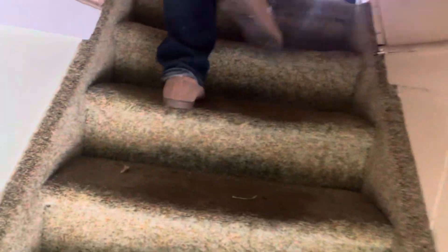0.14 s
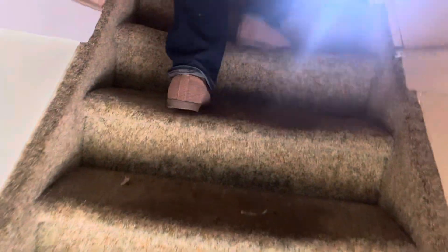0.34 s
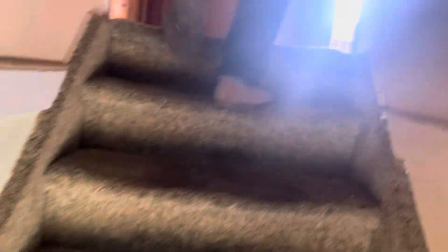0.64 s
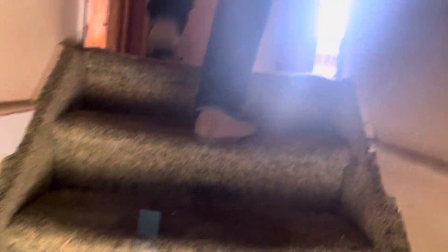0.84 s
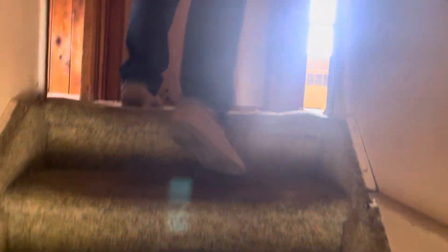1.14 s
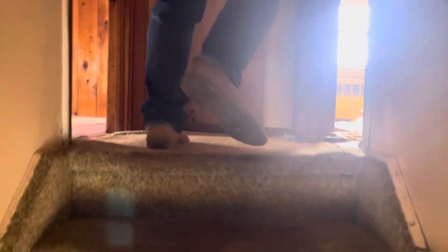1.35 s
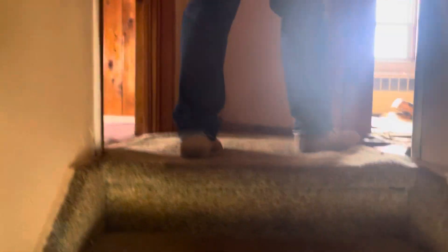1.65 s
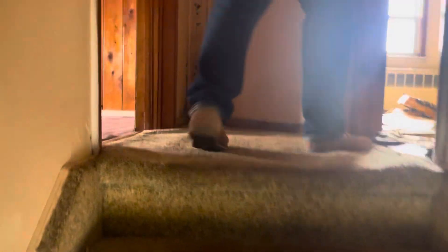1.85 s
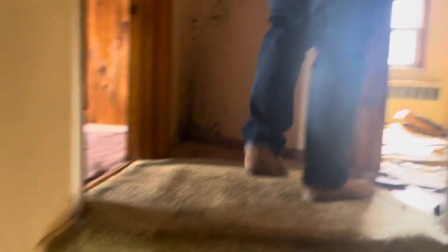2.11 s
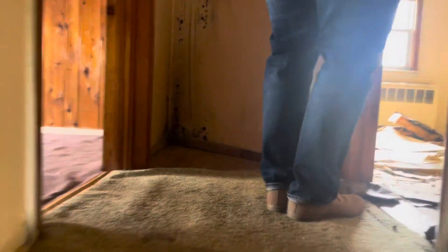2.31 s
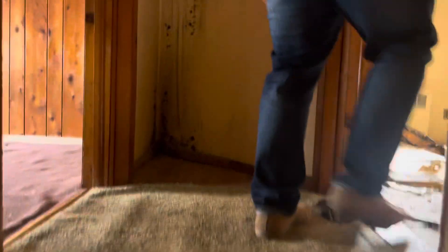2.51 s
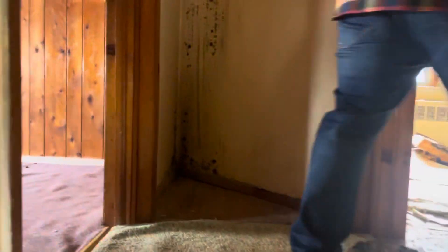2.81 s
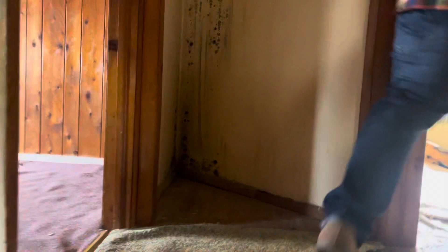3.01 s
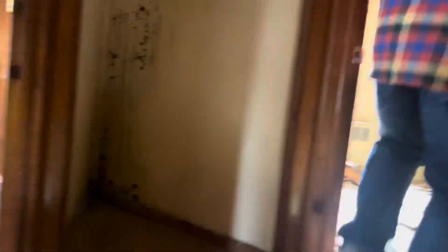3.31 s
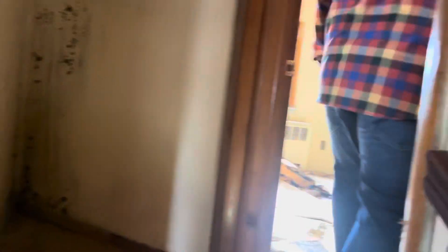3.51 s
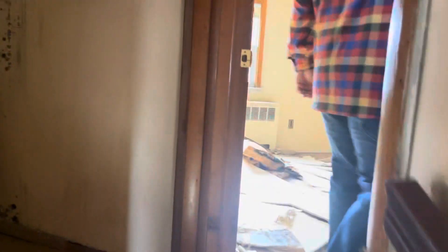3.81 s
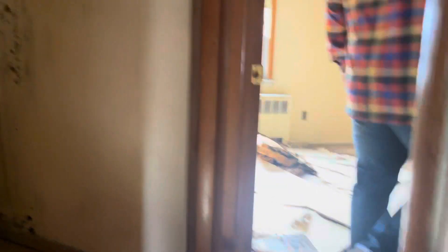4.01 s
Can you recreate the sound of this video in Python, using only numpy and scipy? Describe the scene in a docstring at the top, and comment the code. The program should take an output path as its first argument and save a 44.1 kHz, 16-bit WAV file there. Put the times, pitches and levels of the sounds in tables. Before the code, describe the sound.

Close stereo pickup in a small stairwell: dull, bass-heavy footfalls on carpet over hollow wood, each sagging downward in pitch and leaving a brief murmur in the floor. Quiet steps of a second climber fill the gaps. Soft scuffs grow more frequent on the landing, clothing hisses lightly, and something small knocks and clicks beside the microphone midway, then clicks again late. Little else breaks the quiet.

```python
"""A carpeted wooden staircase and landing: two people climb, heavy steps thudding among lighter ones.
Each foot rings damped stair modes and a noise-tail echo; the floor's hum and the drag swell after it.
Soles scuff the pile and clothes rustle as shaped noise; small things knock (two damped sines) and
click (bursts through resonances) near the microphones. Bass arrives late, so each thud sweeps downward."""
import sys
import numpy as np
from scipy import signal
from scipy.fft import rfft, irfft, next_fast_len
from scipy.io import wavfile
from scipy.ndimage import map_coordinates

SR = 44100
rng = np.random.default_rng(int(sys.argv[2]) if len(sys.argv) > 2 else 0)


def volts_from_db(level):
    """Convert decibel levels to linear amplitude ratios."""
    exponent = np.asarray(level, float) / 20
    return 10 ** exponent


def wrap_up_sound(samples):
    """Save the sound to the file named by the first command line argument, as 16-bit audio."""
    columns = np.atleast_2d(samples).T
    # keep every value between -1 and 1, then stretch to whole-number steps
    tamed = np.clip(columns, -1, 1)
    steps = np.round(tamed * 32767).astype(np.int16)
    wavfile.write(sys.argv[1], SR, steps)


N = 183191  # length in samples

# footfalls: t/s, blow on the tread/dB, settling weight/dB, softness (joist over tread)/dB, distance/m
FOOTFALLS = [(0.034, -41.5, -50.5, -4, 0.78), (0.219, -40.5, -24.5, 19, 1.9),
             (0.356, -31.5, -52, -32.5, 3.9), (0.418, -35, -70, -3, 3.9), (0.456, -39.5, -42.5, 10.5, .6),
             (0.55, -48, -44.5, 5, 1), (0.875, -51.5, -44, 6, 0.96), (0.926, -39, -33, 4, 3.6),
             (0.949, -37, -40, 7, 1.3), (1.006, -15, -22, -8, 1.12), (1.125, -46, -49, -1, 2.1),
             (1.18, -41.5, -68, -11, 2.3), (1.367, -46.5, -40.5, 2, .4), (1.705, -17, -19.5, -6, 1.38),
             (2.203, -47.5, -42.5, -2, 1.3), (2.378, -9, -13.5, -19.5, 1.43),
             (2.618, -29.5, -74, -6.5, 2.4), (2.656, -42, -54, -5, 1.2), (2.7, -36.5, -53, -16, 3.6),
             (2.89, -43.5, -47, -15, 2.6), (2.96, -18, -20, 0, 1.94), (3.092, -44, -42, 9, 0.46),
             (3.231, -49.5, -56, 8, 1.9), (3.329, -43.5, -62, 5, 0.3), (3.587, -40, -69, 2.5, 3.2),
             (3.646, -18.5, -22, 4, 1.17), (3.97, -58.5, -57, -3, 4.8)]
# width of the low sounds: f/Hz, side over mid/dB
LOW_WIDTH = [(60, -14.5), (150, -11), (350, -11), (700, -2.5), (1500, -4)]
SWEEP_CYCLES = 1.3  # bass delay, in periods of (pitch + 15 Hz)
STILL_DB = -47.5  # level of the still floor


def along(points, hz):
    """Reads a (f/Hz, value) curve on a log frequency axis."""
    f, v = np.transpose(points)
    return np.interp(np.log(hz + 1), np.log(f + 1), v)


def curves(rows):
    """One value per sample for each column after the time."""
    s, *cols = np.transpose(rows)
    return [np.interp(np.arange(N) / SR, s, c) for c in cols]


def wobble(rate):
    """A smooth random curve with rate knots a second."""
    knots = rng.standard_normal(int(N * rate / SR) + 4)
    return map_coordinates(knots, [np.arange(N) * rate / SR])


def filtered(x, response):
    """Shapes x by a complex response of frequency."""
    m = next_fast_len(N + SR // 2)
    return irfft(rfft(x, m) * response(np.fft.rfftfreq(m, 1 / SR)), m)[..., :N]


def muffled(x, top_hz):
    """A steep causal low-pass: padding swallows the edge of a blow."""
    return signal.sosfilt(signal.butter(10, top_hz, fs=SR, output="sos"), x)


def add(track, s, sound):
    """Mixes a sound in at s seconds."""
    part = track[..., max(round(s * SR), 0):][..., :sound.shape[-1]]
    part += sound[..., :part.shape[-1]]


def pair(mid, side):
    """Left and right from mid and side."""
    return np.array([mid + side, mid - side])


def wide_noise(spectrum):
    """Stereo noise, mid rms 1, narrow in the bass and wider above."""
    a, b = rng.standard_normal((2, N))
    mid = filtered(a, lambda hz: volts_from_db(along(spectrum, hz)))
    side = filtered(b, lambda hz: volts_from_db(along(spectrum, hz) + along(LOW_WIDTH, hz)))
    return pair(mid, side) / np.std(mid)


def ports(spectrum):
    """Stereo noise, mid rms 1, as two close ports hear it: out of step at the top."""
    # sum of the ports: f/Hz, level/dB
    sum_db = [(9000, 1.5), (9700, 0), (10200, -35.5), (10600, -2), (11200, -0.5)]
    # difference of the ports: f/Hz, level/dB
    difference_db = [(400, -7.5), (1000, 0.5), (4000, -3.5), (6300, -4), (7500, -3.5), (8700, -13),
                     (9500, 4.5), (10500, 7.5), (11500, -3), (12500, -8)]
    # share of the difference that follows the sum: f/Hz, share/0-1
    tied_share = [(2000, 0), (5000, 0.6), (9000, 0.9)]
    a, b = rng.standard_normal((2, N))
    tied = lambda hz: np.clip(along(tied_share, hz), 0, .99)
    wide = lambda hz: volts_from_db(along(spectrum, hz) + along(difference_db, hz))
    mid = filtered(a, lambda hz: volts_from_db(along(spectrum, hz) + along(sum_db, hz)))
    following = filtered(a, lambda hz: 1j * tied(hz) * wide(hz))  # a quarter cycle from the sum
    free = filtered(b, lambda hz: np.sqrt(1 - tied(hz) ** 2) * wide(hz))
    return pair(mid, following + free) / np.std(mid)


def stirring():
    """Weight shifts after every footfall: a swell that dies away, in dB over the still floor."""
    peak_s, under_foot_db = 0.099, -25  # swell's peak: time after landing, level against the foot
    power, u = np.ones(N), np.arange(SR) / SR / peak_s
    for s, blow_db, weight_db, *_ in FOOTFALLS:
        peak = volts_from_db(max(blow_db, weight_db) + under_foot_db - STILL_DB)
        add(power, s, (peak * u * np.exp(1 - u)) ** 2)
    return 10 * np.log10(power)


def house():
    """The floor keeps stirring under shifting weight: a low noise hum that swells after each step."""
    # colour of the hum: f/Hz, relative density/dB per Hz
    hum = [(15, -60), (25, 11), (59, 14.5), (135, 0), (257, -5), (358, -12.5), (395, -4), (480, -9.5),
           (700, -23), (910, -67), (1540, -120)]
    return volts_from_db(STILL_DB + stirring() + 1.9 * wobble(7.75)) * wide_noise(hum)


def movement():
    """Soles drag softly over the pile, more after a step; cloth hisses with a flickering level."""
    # rustle of clothes: t/s, level/dB
    rustling = [(0.0, -60), (0.66, -63), (1.0, -62.5), (1.36, -65.5), (1.58, -65), (1.81, -63),
                (2.03, -72.5), (2.24, -60), (2.35, -58.5), (2.51, -66.5), (2.95, -63.5), (3.19, -67),
                (3.43, -64.5), (3.61, -61), (3.84, -66), (4.15, -62)]
    # colour of the drag: f/Hz, relative density/dB per Hz
    drag_colour = [(150, -4), (350, -4), (600, -3.5), (1000, -6.5), (2000, -12), (3500, -16), (7000, -34)]
    # colour of the rustle: f/Hz, relative density/dB per Hz
    cloth_colour = [(800, 2), (2000, -3), (4000, -1), (6000, -0.5), (8500, 4.5), (11000, 3), (12000, -12),
                    (13000, -81)]
    drag_db = -60 + 0.22 * stirring() + 1.6 * wobble(30)  # 0.22 dB gained per dB of stirring
    drag = volts_from_db(drag_db) * wide_noise(drag_colour)
    cloth_db = curves(rustling)[0] + 0.79 * wobble(16) + 0.24 * wobble(100)
    return drag + volts_from_db(cloth_db) * ports(cloth_colour)


def echo(sound):
    """The stairwell's answer, new for each step: a noise tail in which each frequency dies at its own speed."""
    # decay of the stairwell: f/Hz, t60/s
    decay = [(60, 0.9), (150, 0.34), (400, 0.51), (1500, 0.73)]
    hz, t, z = signal.stft(rng.standard_normal((2, SR // 2)), SR, nperseg=1024)
    fading = z * volts_from_db(-60 * t / along(decay, hz)[:, None])
    tail = signal.istft(fading, SR, nperseg=1024)[1]
    onset = np.clip(np.arange(tail.shape[1]) / (0.0086 * SR), 0, 1)  # 8.6 ms fade-in
    tail = tail * onset / np.linalg.norm(tail[0])
    return signal.fftconvolve(sound[None], tail, axes=1)


def steps():
    """Each foot rings the same stair modes with its own weight; the boom starts late, as the weight settles."""
    # pitches where tread, boom, joist and riser are weighted: f/Hz
    part_hz = [200, 60, 120, 350]
    # what the stair rings with: f/Hz, level/dB, t60/s
    stair = [(37.1, 1, 0.5), (58.5, 1, 0.16), (63.2, 8, 0.35), (79.45, -11, 0.56), (108.5, 2.5, 0.15),
             (134, -7, 0.22), (147.9, -1.5, 0.25), (190.8, 1.5, 0.17), (215.3, -7, 0.265), (280, 0, 0.17),
             (339.6, 3, 0.19), (390.4, -3.5, 0.24), (460, -22, 0.58), (487, -17, 0.064), (132.5, 3, 0.046),
             (186.6, -2.5, 0.037), (314, 6.5, 0.028)]
    # phase of the thuds' side part: f/Hz, phase/radians
    side_phase = [(60, 2.1), (150, 0.98), (400, 2.1)]
    riser_db, riser_loss, riser_gain = -20.5, 1.2, 0.23  # under the tread; dB per dB of softness, of hardness
    even_m = 2.01  # distance at which the echo enters at unit gain
    direct, answer, t = np.zeros(N), np.zeros((2, N)), np.arange(SR // 2) / SR
    hz, mode_db, t60 = np.transpose(stair)[:, :, None]
    order = np.argsort(part_hz)
    age = np.clip(t - 0.01446 * (hz < 95), 0, None)  # boom modes start 14.46 ms late
    build_up = 1 - np.exp(-age * hz / 0.27)
    shape = build_up * np.sin(2 * np.pi * hz * age) * volts_from_db(-60 * age / t60)
    for s, blow_db, boom_db, soft_db, far_m in FOOTFALLS:
        joist_db = blow_db + soft_db
        ringing_db = blow_db + riser_db - max(riser_loss * soft_db, riser_gain * soft_db)
        weight_db = [blow_db, boom_db, joist_db, ringing_db]
        colour_db = along(np.transpose([part_hz, weight_db])[order], hz)
        spread_db = 1.5 * rng.standard_normal(hz.shape)  # every foot excites the modes a little differently
        # a soft landing has a duller edge
        top_hz = np.clip(500 * volts_from_db(0.14 * (ringing_db - max(weight_db) + 13.0)), 250, 700)
        ring = muffled(np.sum(volts_from_db(mode_db + colour_db + spread_db) * shape, 0), top_hz)
        start = s - SWEEP_CYCLES / 260  # early, to make up for the later bass delay
        add(direct, start, ring)
        early = ring[:SR // 16] * np.hanning(SR // 8)[SR // 16:]
        add(answer, start, far_m / even_m * echo(early))
    side = filtered(answer[1], lambda f: volts_from_db(along(LOW_WIDTH, f) - 1.5))
    tilt = filtered(direct, lambda f: volts_from_db(along(LOW_WIDTH, f) - 2.5) * np.exp(1j * along(side_phase, f)))
    return pair(direct + answer[0], side + tilt)


def scuffs():
    """A sole catches the pile: grainy noise that bites at the start and then fades, with its own colour."""
    # scuffs: t/s, rub of the sole/dB, hiss of the fibres/dB, t60/s, fineness of the hiss/dB per octave
    catches = [(0.043, -56.5, -69, 0.23, 3), (0.353, -62, -60, 0.21, -11.5), (0.406, -51, -63, 0.34, -11.5),
               (0.71, -48, -81, 0.18, 3), (0.797, -74, -60, 0.55, 5), (0.939, -50.5, -81, 0.14, 4),
               (1.02, -45, -75, 0.18, -11), (1.187, -65, -66, 0.17, -5), (1.334, -52.5, -70, 0.89, 0),
               (1.556, -55.5, -69.5, 0.5, 10), (1.702, -50.5, -84, 0.2, -11), (1.901, -44.5, -75, 0.39, -6),
               (1.974, -46, -69.5, 0.43, -14), (2.191, -44.5, -76, 0.26, -6), (2.385, -42, -75, 0.32, -10),
               (2.615, -44, -53, 0.36, 5), (2.684, -40.5, -63.5, 0.31, 8), (2.759, -66, -64, 0.96, 5),
               (2.958, -53.5, -74, 0.22, -13.5), (3.04, -68, -52.5, 0.49, -2.5),
               (3.428, -77, -66, 0.65, 9.5), (3.646, -46.5, -67, 0.25, -2), (3.67, -47, -78, 0.23, -6),
               (3.75, -75, -51, 0.4, 4), (3.828, -71, -58, 0.29, 2.5), (3.923, -69, -53, 0.31, 1)]
    # centres of the noise bands: f/Hz
    band_hz = [560, 1500, 3500, 8500]
    # colour of the rub in those bands: level/dB
    rub_colour = [0, -10, -37, -45]
    # colour of the hiss in those bands: level/dB
    hiss_colour = [-12, -3.5, -0.5, -2.56]
    levels, t = np.zeros((4, N)), np.arange(SR // 2) / SR
    for s, rub_db, hiss_db, t60, fine_db in catches:
        t60 = max(t60, .02)
        fine_hiss_db = hiss_db + fine_db * np.log2(np.divide(band_hz, band_hz[2]))
        fade = volts_from_db(-60 * t / t60) * (1 - np.exp(-t / (0.018 * t60)))
        bite = 1 + 0.95 * np.exp(-t / 0.005)
        rub = volts_from_db(rub_db) * volts_from_db(rub_colour)
        hiss = volts_from_db(fine_hiss_db) * volts_from_db(hiss_colour)
        add(levels, s, np.hypot(rub, hiss)[:, None] * fade * bite)
    shared_db = 1.4 * wobble(220)  # grain common to all bands
    out = np.zeros((2, N))
    for level, c in zip(levels, band_hz):
        band = [(c / 2.4, -30), (c / 1.6, -6.5), (c, 0), (c * 1.5, -7.5), (c * 2.4, -30)]  # f/Hz, level/dB
        out += level * volts_from_db(shared_db + 0.66 * wobble(50)) * ports(band)
    return out


def clicks():
    """Dry clicks: millisecond noise bursts and a sharp release through a few stiff resonances."""
    # clicks: t/s, snap/dB, left over right/dB, body near 2 kHz/dB
    snaps = [(0.3434, -55, 13, -30), (0.355, -50, 5, -34), (0.41, -32, 5.5, -13), (1.031, -50, 14, -23),
             (1.0662, -47, -2, -26), (1.9121, -2.5, 25, -12.5), (1.927, -4, 23, -14),
             (1.937, 1.5, 33.5, -10.5), (1.9506, -10, 16, -19), (3.7583, -11.5, 2, -37),
             (3.838, -32, 1.5, -22), (3.939, -16.5, 15, -36)]
    # resonances, body first: f/Hz, width/Hz, level/dB, share of the left-right lean/0-1
    resonances = [(1950, 1700, -2.5, 0.91), (4300, 2600, -3, 0.53), (5600, 1580, -2.5, 0.78),
                  (9440, 3500, -15.5, 0.09)]
    drive, t = np.zeros((len(resonances), 2, N)), np.arange(SR // 20) / SR
    lean = np.transpose(resonances)[3][:, None, None] * [[.5], [-.5]]
    envelope = volts_from_db(-60 * t / 0.0042) * (1 - np.exp(-t / 0.00067)) ** 2
    for s, db, pan_db, body_db in snaps:
        a, b = rng.standard_normal((2, len(t)))
        burst = pair(a, 0.19 * b) * envelope
        burst[:, round(.0008 * SR)] += .6  # the sharp moment of release
        level_db = np.array([body_db, db, db, db])[:, None, None]
        add(drive, s, burst * volts_from_db(level_db + lean * pan_db))
    mode = lambda c, w, db: lambda f: volts_from_db(db) * 1j * f * w / (c * c - f * f + 1j * f * w)
    # neighbouring resonances have opposite signs
    rings = [(-1) ** k * filtered(drive[k], mode(*row[:3])) for k, row in enumerate(resonances)]
    return filtered(sum(rings), lambda f: 1 / (1 + (700 / (f + 1)) ** 4))  # bass cut


def knocks():
    """A small hollow object knocks close by: two quickly damped modes, muffled."""
    # knocks: t/s, upper mode/dB, its pitch f/Hz, body mode at 330 Hz/dB
    hits = [(0.49, -26, 574, -22.5), (0.531, -34.5, 580, -19.5), (1.466, -36.5, 520, -39),
            (1.518, -44, 523, -39.5), (1.564, -35, 620, -27), (1.908, -32.5, 630, -34),
            (1.922, -27, 640, -48), (1.932, -21.5, 574, -17), (1.957, -20.5, 396, -28),
            (1.999, -35, 610, -12.5), (2.092, -29, 616, -39)]
    out, t = np.zeros(N), np.arange(SR // 8) / SR
    for s, db, hz, body_db in hits:
        top = volts_from_db(db - 60 * t / 0.024) * np.sin(2 * np.pi * hz * t)
        body = volts_from_db(body_db - 60 * t / 0.01) * np.sin(2 * np.pi * 330 * t)
        start = s - SWEEP_CYCLES / 400  # early, to make up for the later bass delay
        add(out, start, (top + body) * (1 - np.exp(-t / 0.00029)))
    out = muffled(out, top_hz=805)
    return pair(out, filtered(out, lambda f: 0.49 * np.exp(1.3j) + 0 * f))  # side turned by 1.3 radians


def scene():
    """Everything the microphones hear."""
    return house() + movement() + steps() + scuffs() + clicks() + knocks()


def roll_off(x):
    """The treble ends steeply here."""
    return signal.sosfilt(signal.butter(12, 13080, fs=SR, output="sos"), x)


def record(dry):
    """Bass and treble cuts, and a delay that grows toward low pitch."""
    delay = lambda hz: np.exp(-2j * np.pi * SWEEP_CYCLES * np.log(hz + 15))
    bass_cut = lambda hz: 1 / (1 + (36 / (hz + 1)) ** 6)
    treble_cut = lambda hz: 1 / (1 + (hz / 12300) ** 30)
    mix = filtered(dry, lambda hz: delay(hz) * bass_cut(hz) * treble_cut(hz))
    return roll_off(mix)


dry = scene()
out = record(dry)
wrap_up_sound(out)
```